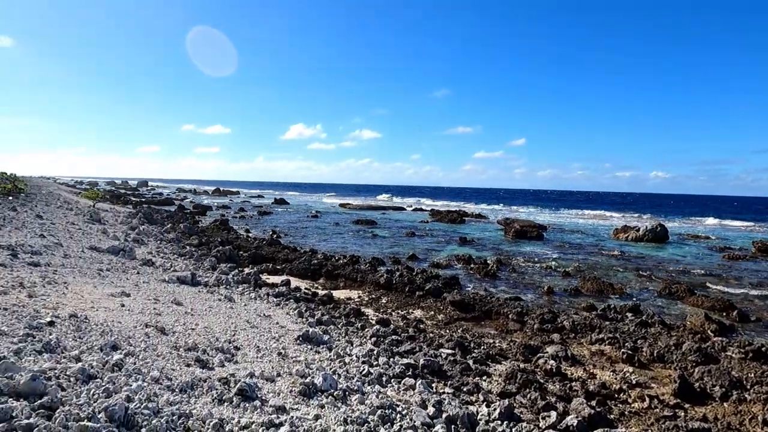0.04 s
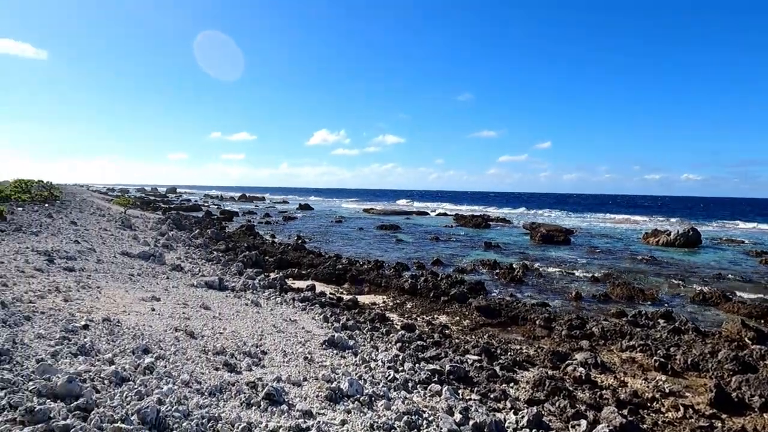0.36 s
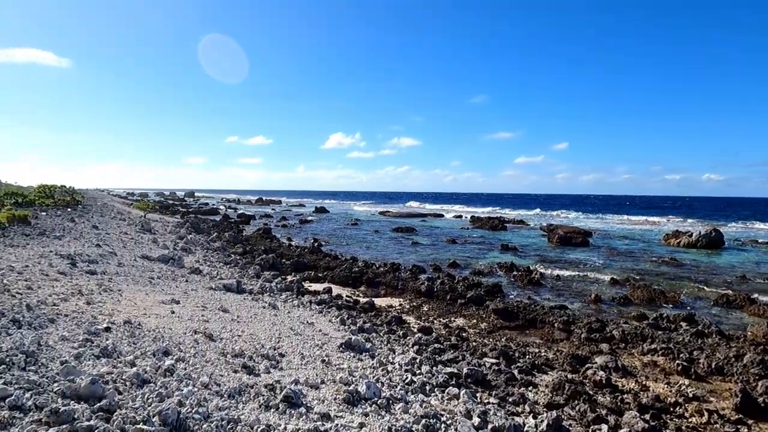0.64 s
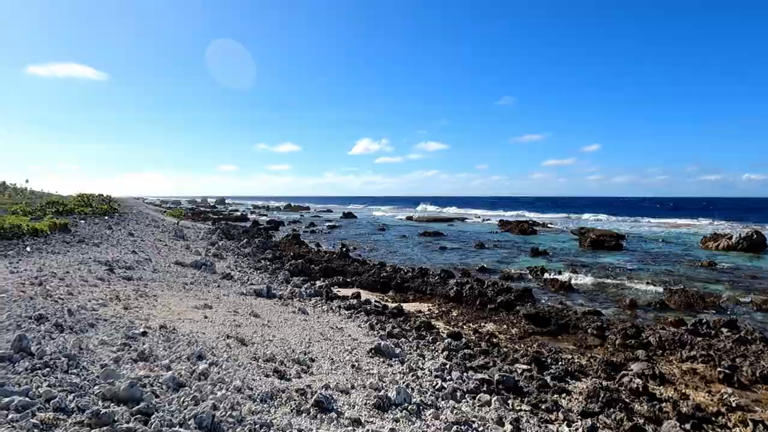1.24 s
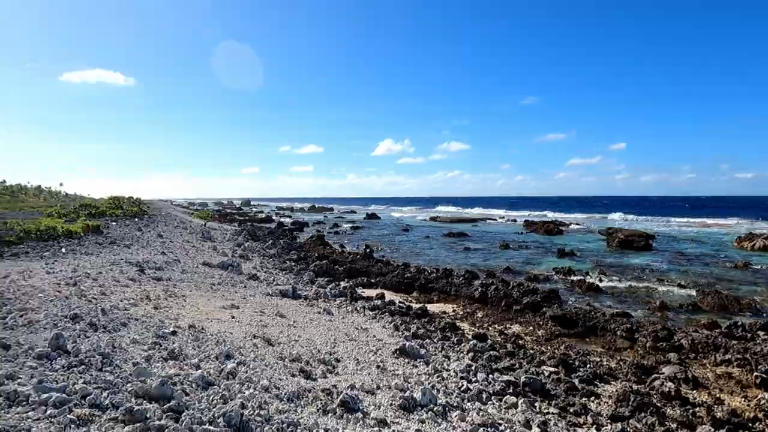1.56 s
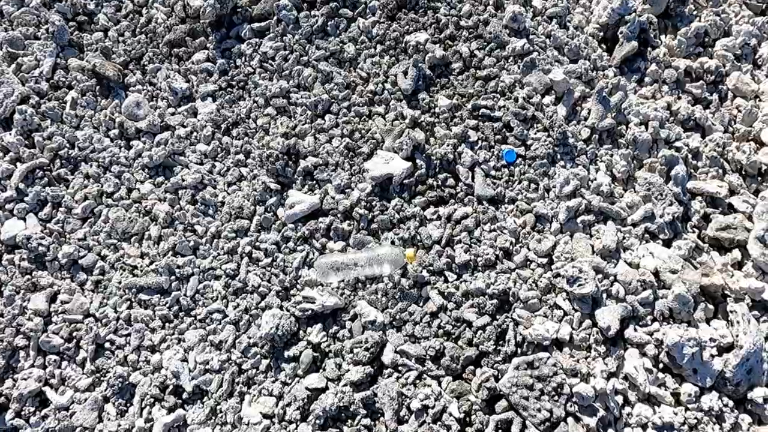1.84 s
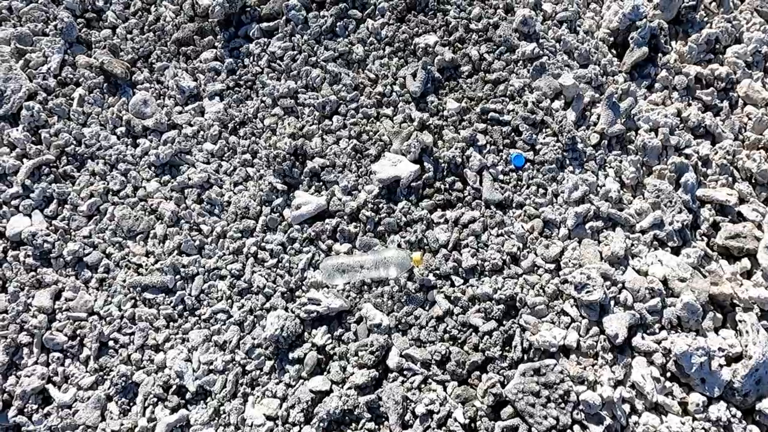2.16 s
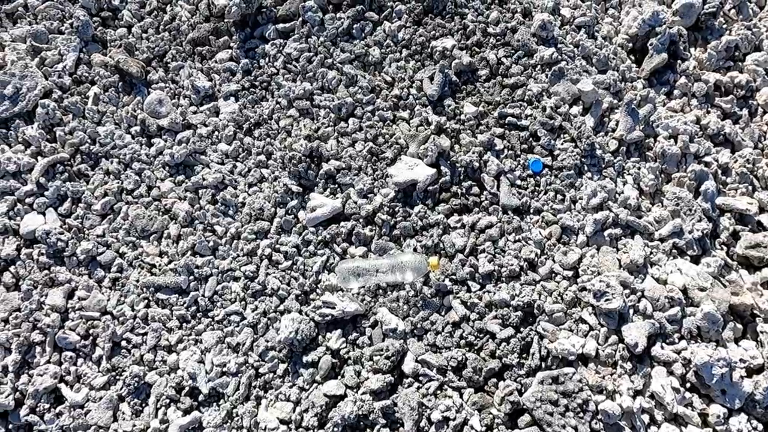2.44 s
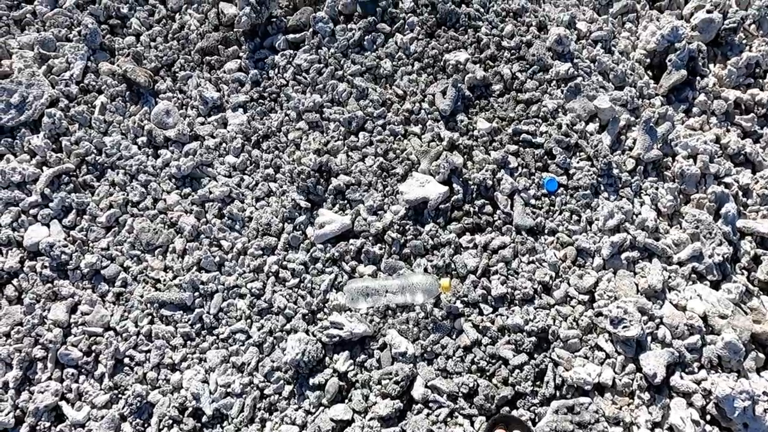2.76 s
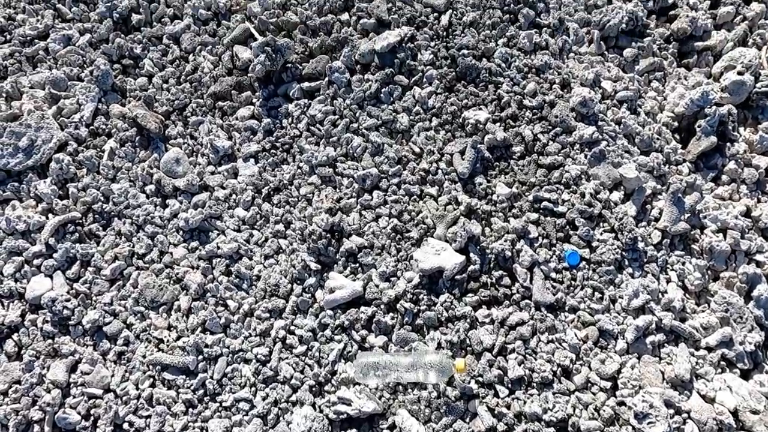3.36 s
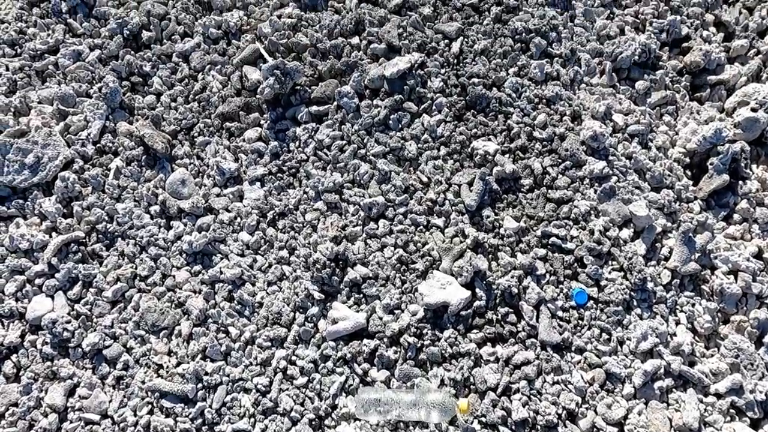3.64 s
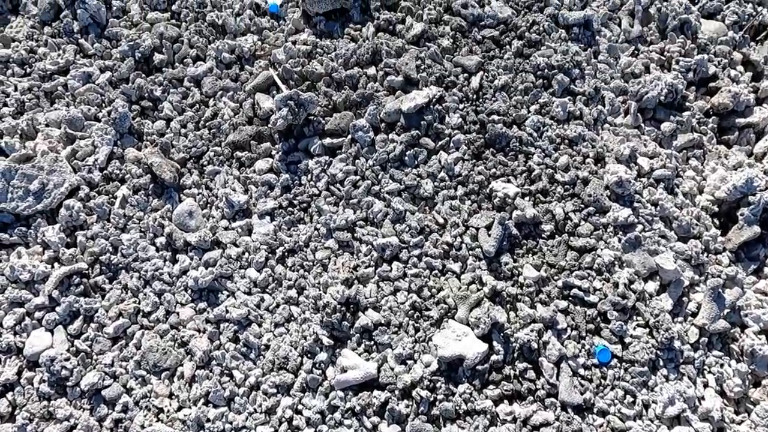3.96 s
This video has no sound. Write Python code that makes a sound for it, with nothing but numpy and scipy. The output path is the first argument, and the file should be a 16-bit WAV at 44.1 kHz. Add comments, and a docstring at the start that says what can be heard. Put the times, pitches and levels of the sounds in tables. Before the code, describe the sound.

Sea surf sounds as a soft, even, distant roar until it cuts off at 1.6 seconds. After a short silence, a much louder wave fades in close by at 1.8 seconds, bubbling and hissing with foam. It eases by 3.3 seconds and swells slightly near 3.6. Water slaps the rocks a few times, coral pieces clink faintly from 2.6 seconds, and wind buffets the microphone between 2 and 3 seconds.

```python
"""A beach of coral rubble, facing the surf on a reef; the microphone hears it almost in mono.
Far off, breakers merge into an even roar. After a short silence a wave fades in close by,
washes out and swells again. Bubbles and slaps of trapped air ring in the white water,
foam hisses on top, a few pieces of coral clink and wind buffets the microphone."""
import sys
import numpy as np
from scipy import signal
from scipy.fft import rfft, irfft
from scipy.io import wavfile

SR = 44100
rng = np.random.default_rng(int(sys.argv[2]) if len(sys.argv) > 2 else 0)


def inscribe(sig):
    """Save sig as 16-bit PCM at rate SR to the path in sys.argv[1].

    A 1-D sig is mono; a 2-D sig holds one channel per row.
    Samples are clipped to [-1, 1] before scaling.
    """
    pcm = np.round(np.clip(np.atleast_2d(sig).T, -1, 1) * 32767)
    wavfile.write(sys.argv[1], SR, pcm.astype(np.int16))


N = 176400
TIME = np.arange(N) / SR


def from_db(db):
    """Decibels to gain."""
    return 10 ** (np.asarray(db) / 20)


def unit_rms(x):
    """Scale to an rms of 1."""
    return x / np.sqrt(np.mean(x ** 2) + 1e-20)


def in_time(rows):
    """Each column of a curve at every sample."""
    times, *columns = np.transpose(rows)
    return [np.interp(TIME, times, column) for column in columns]


def at_hz(spectrum, hz):
    """Read a spectrum's level on a log-frequency axis."""
    points_hz, points_db = np.transpose(spectrum)
    return np.interp(np.log(hz), np.log(points_hz), points_db)


def drift(rate_hz):
    """Smooth random wander with an rms of 1."""
    hop, settle = 40, 2000
    pole = np.exp(-2 * np.pi * rate_hz * hop / SR)
    noise = rng.standard_normal(N // hop + settle + 2)
    slow = signal.lfilter([1], [1, -2 * pole, pole * pole], noise)[settle:]
    return np.interp(np.arange(N) / hop, np.arange(len(slow)), unit_rms(slow))


def click(s, db):
    """One impulse."""
    return from_db(db) * (np.arange(N) == int(s * SR))


def ring(clicks, hz, t60):
    """Each click starts a sine that dies away by 60 dB in t60 seconds."""
    decay, step = from_db(-60 / (t60 * SR)), 2 * np.pi * hz / SR
    return signal.lfilter([0, np.sin(step)], [1, -2 * decay * np.cos(step), decay ** 2], clicks + 1e-18)


def dull(x, top_hz=6200):
    """Take the top off a ringing sound."""
    return signal.sosfilt(signal.butter(4, top_hz, fs=SR, output="sos"), x)


def noise_bands(spectrum, flicker_db, flicker_hz, surge_db, surge_hz):
    """Half-octave noise bands that surge together and flicker with their neighbours: (centres, bands)."""
    centres = 22 * 2 ** (np.arange(20) / 2)
    hz = np.maximum(np.arange(N // 2 + 1) * SR / N, 1)
    coloured = rfft(rng.standard_normal(N)) * from_db(at_hz(spectrum, hz))
    surge = surge_db * drift(surge_hz)
    below, bands = drift(flicker_hz), []
    for centre in centres:
        own = drift(flicker_hz)
        triangle = np.maximum(1 - 2 * abs(np.log2(hz / centre)), 0)
        flicker = flicker_db * (own + below) / np.sqrt(2)
        bands.append(irfft(coloured * triangle, N) * from_db(surge + flicker))
        below = own
    return centres, np.array(bands)


# Spectrum of the noise that differs between left and right: f/Hz, relative level/dB
SIDE_SPECTRUM = [(100, 4), (300, -14), (1000, -32), (2200, -24), (3600, 1.5), (6000, 9.5), (8000, -1),
                 (9000, -31), (10400, -20.5), (14000, -32.5)]

def stereo_side():
    """Faint noise, opposite in the two channels, lies under the sound."""
    _, bands = noise_bands(SIDE_SPECTRUM, flicker_db=0.8, flicker_hz=10, surge_db=1, surge_hz=10)
    return from_db(-33.5) * unit_rms(bands.sum(axis=0)) * np.array([[1], [-1]])


# Breeze at the microphone: t/s, level/dB
BREEZE = [(0, -58.5), (1.6, -59), (1.86, -42), (2.07, -32.5), (2.32, -56), (2.7, -62), (2.87, -37),
          (3.07, -53), (3.6, -62), (3.8, -46), (4, -57.5)]
# Single buffets: t/s, level/dB, half-width/s
WIND_BUFFETS = [(.02, -50, .025), (0.34, -53, 0.031), (0.727, -57, 0.017), (0.944, -57, 0.017),
                (2.509, -31.5, 0.013), (2.936, -35, 0.012)]
# Spectrum of the wind rumble: f/Hz, relative level/dB
RUMBLE_SPECTRUM = [(20, -21), (45, -1.5), (100, -2.5), (170, -3.5), (300, -16), (2000, -100)]

def wind():
    """Right on the microphone, a lumpy rumble follows the breeze and jumps with each buffet."""
    breeze_db, = in_time(BREEZE)
    buffets = sum(from_db(db) * np.exp(-((TIME - s) / width) ** 2) for s, db, width in WIND_BUFFETS)
    _, bands = noise_bands(RUMBLE_SPECTRUM, flicker_db=3.6, flicker_hz=11, surge_db=-1.1, surge_hz=15)
    return (from_db(breeze_db) + buffets) * unit_rms(bands.sum(axis=0))


# Bubbles in the white water, far and near: f/Hz, relative level/dB
BUBBLE_SPECTRUM = [(260, -22), (400, -23), (900, -22.5), (2000, -23), (4500, -30)]

def bubbles(per_s=2200, cycles=16, spread_db=3.0):
    """Bubbles of all sizes are born at random and ring for a few cycles."""
    pitches = np.geomspace(BUBBLE_SPECTRUM[0][0], BUBBLE_SPECTRUM[-1][0], 26)
    strengths = from_db(spread_db * np.minimum(rng.exponential(1, N), 5))
    signs = rng.choice([-1, 1], N)
    born = rng.random(N) < per_s / SR
    clicks = strengths * signs * born
    pitch_index = rng.integers(0, len(pitches), N)
    bubbling = np.zeros(N)
    for k, hz in enumerate(pitches):
        ringing = ring(clicks * (pitch_index == k), hz, cycles / hz)
        bubbling += from_db(at_hz(BUBBLE_SPECTRUM, hz)) * unit_rms(ringing)
    return bubbling


# Strength of the distant breakers: t/s, relative level/dB
BREAKER_LEVEL = [(0, -46.5), (.35, -46), (.9, -44.5), (1.25, -45.5), (1.6, -44.5)]
# Their roar as it reaches the beach: f/Hz, relative level/dB
ROAR_SPECTRUM = [(30, -35), (110, -13), (160, -9), (230, -0.5), (400, -0.5), (620, -2.5), (1000, -5.5),
                 (1300, -9), (1900, -10), (3800, -15.5), (5400, -21.5), (7000, -29), (8300, -39),
                 (9000, -48), (9600, -43), (10600, -36), (11400, -50), (14000, -67)]

def far_surf(bubbling, side):
    """Far out on the reef edge, breakers merge into an even roar."""
    level_db, = in_time(BREAKER_LEVEL)
    _, bands = noise_bands(ROAR_SPECTRUM, flicker_db=0.53, flicker_hz=24, surge_db=0.27, surge_hz=20)
    roar = from_db(3.18) * unit_rms(bands.sum(axis=0))
    return from_db(level_db) * (roar + bubbling + side)


# Coral knocking together nearby: t/s, relative level/dB, lowest mode f/Hz, tilt/(dB per octave)
CORAL_KNOCKS = [(2.598, -20, 3310, 1), (2.8544, -14.5, 2910, -10.5), (2.885, -14.5, 2900, -15),
                (3.0237, -11.5, 3070, -3), (3.042, -20.5, 3250, 0), (3.1861, -17.5, 2570, -11),
                (3.637, -19, 2880, -5)]
# Modes of one piece: multiple of the lowest mode, relative level/dB, t60/s
CORAL_MODES = [(1, -10.5, 0.062), (1.45, -2, 0.0086), (1.68, -6, .006), (2.2, -13, .012)]

def coral_clinks():
    """Each knock rings the modes of one piece of rubble; a soft contact spares the upper ones."""
    return sum(ring(click(s, db + mode_db + tilt_db * np.log2(multiple)), hz * multiple, t60)
               for s, db, hz, tilt_db in CORAL_KNOCKS
               for multiple, mode_db, t60 in CORAL_MODES)


# Water slapping the rock nearby: t/s, level/dB, f/Hz
WATER_SLAPS = [(2.094, -11, 1110), (2.287, -12.5, 513), (2.424, -17.5, 426), (2.631, -15, 770),
               (3.778, -18, 690)]

def slaps(cycles=14):
    """Each slap into a hollow of the rock traps a pocket of air that rings briefly."""
    return sum(ring(click(s, db), hz, cycles / hz) for s, db, hz in WATER_SLAPS)


# Course of the near wave, in relative levels: t/s, water level/dB, foam level/dB
WAVE_LEVELS = [(1.88, -25.5, -27), (2.06, -24, -27.5), (2.2, -25, -29), (2.45, -27.5, -29.5),
               (2.62, -28.5, -30), (2.8, -28.5, -31.5), (2.95, -30.5, -32.5), (3.12, -31.5, -36),
               (3.35, -32, -34.5), (3.52, -30.5, -34.5), (3.61, -29.6, -32.1), (3.69, -31, -34.5),
               (3.78, -29, -32.5), (4, -31.5, -34)]
# Its wash at close range, before the bass roll-off: f/Hz, relative level/dB
WASH_SPECTRUM = [(170, -9.5), (280, -.5), (370, 0), (560, -3), (700, -4), (950, -4), (1400, -7.5),
                 (2300, -9), (3200, -11.5), (4300, -15), (5500, -20), (7000, -28.5), (8300, -38.5),
                 (9000, -60), (9600, -45), (10600, -43.5), (11400, -61.5), (14000, -58)]

def near_wave(bubbling, side, foam_above_hz=1500, bass_corner_hz=166):
    """Close to the microphone, water churns full of bubbles, with foam hissing above it."""
    water_db, foam_db = in_time(WAVE_LEVELS)
    hz, bands = noise_bands(WASH_SPECTRUM, flicker_db=0.55, flicker_hz=30, surge_db=0.69, surge_hz=33)
    roll_off_db = 8 * np.minimum(np.log2(hz / bass_corner_hz), 0)   # 8 dB per octave
    bands *= from_db(roll_off_db)[:, None]
    water = from_db(0.86) * unit_rms(bands[hz < foam_above_hz].sum(axis=0))
    foam = from_db(-0.46) * unit_rms(bands[hz >= foam_above_hz].sum(axis=0))
    return from_db(water_db) * (water + bubbling) + from_db(foam_db) * (foam + side)


def scene():
    """Distant surf, a short silence, then the wave at close range; wind blows over both."""
    far_end_s, far_fade_s = 1.609, 0.0067
    near_start_s, near_fade_s = 1.7897, 0.081
    fade_out = np.clip((far_end_s - TIME) / far_fade_s, 0, 1)
    fade_in = np.clip((TIME - near_start_s) / near_fade_s, 0, 1) ** 2.26
    side, bubbling, rumble = stereo_side(), dull(bubbles()), wind()
    far = far_surf(bubbling, side) + rumble
    near = near_wave(bubbling, side) + dull(slaps() + coral_clinks()) + rumble
    return fade_out * far + fade_in * near


def record(dry):
    """A steep low-pass cuts the highest treble."""
    stop_db, stop_hz = 60, 14200
    return signal.sosfilt(signal.cheby2(12, stop_db, stop_hz, fs=SR, output="sos"), dry)


dry = scene()
out = record(dry)
inscribe(out)
```